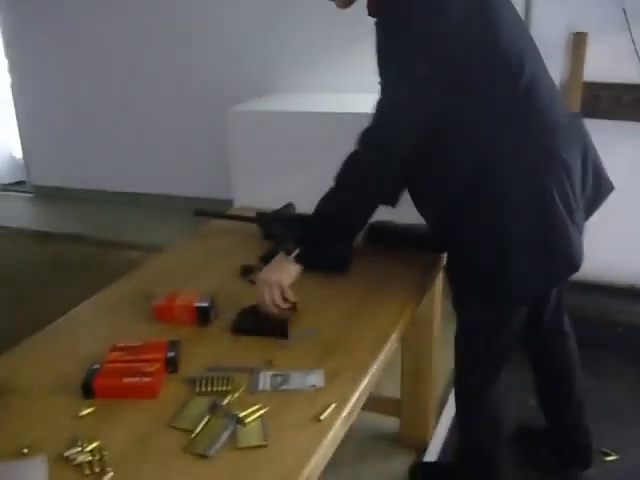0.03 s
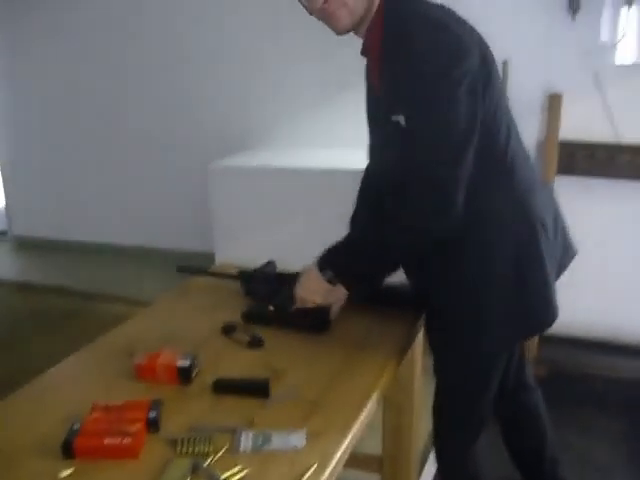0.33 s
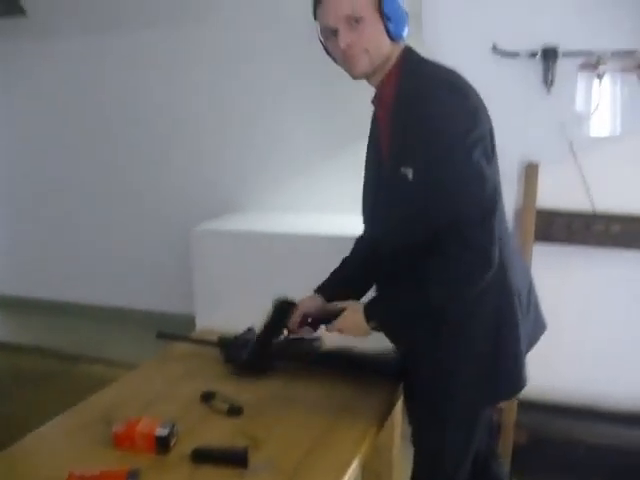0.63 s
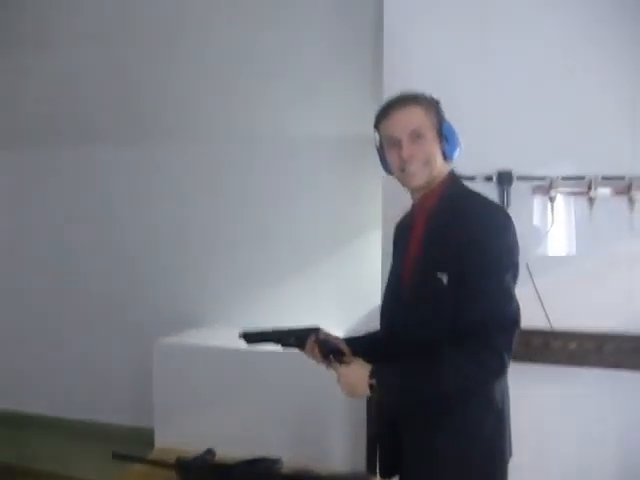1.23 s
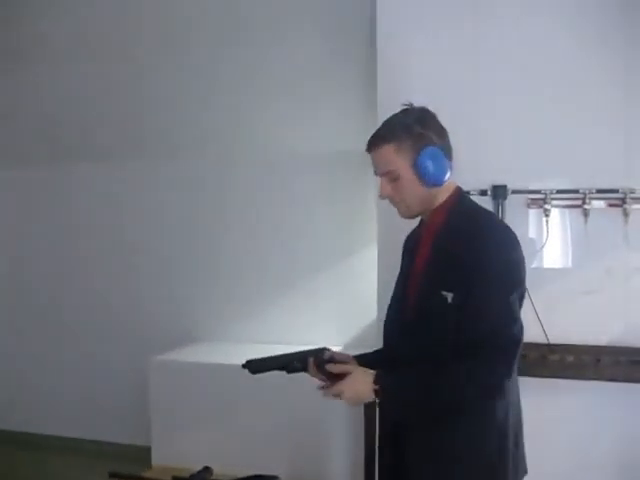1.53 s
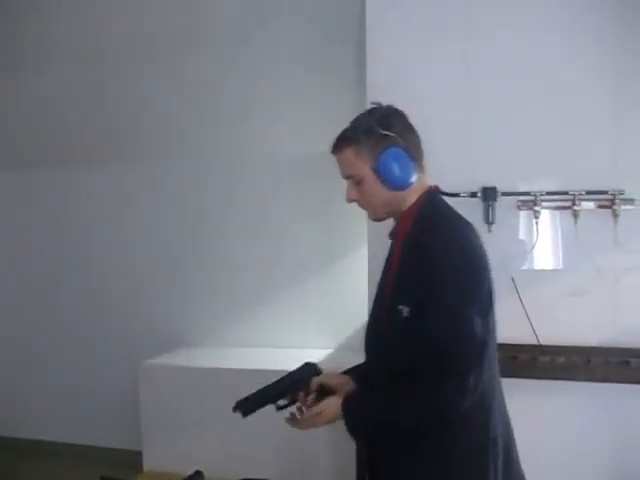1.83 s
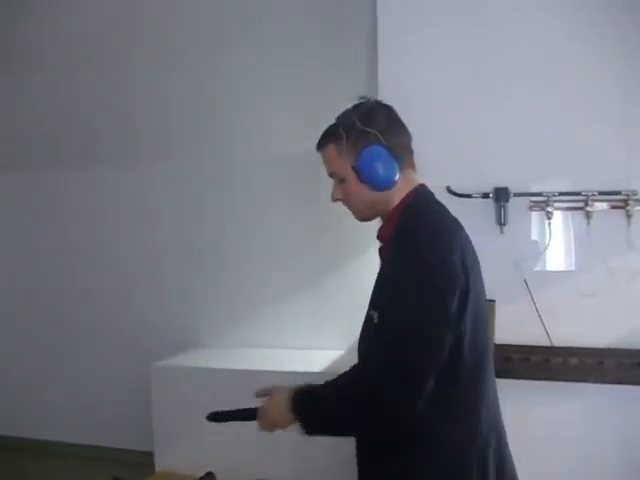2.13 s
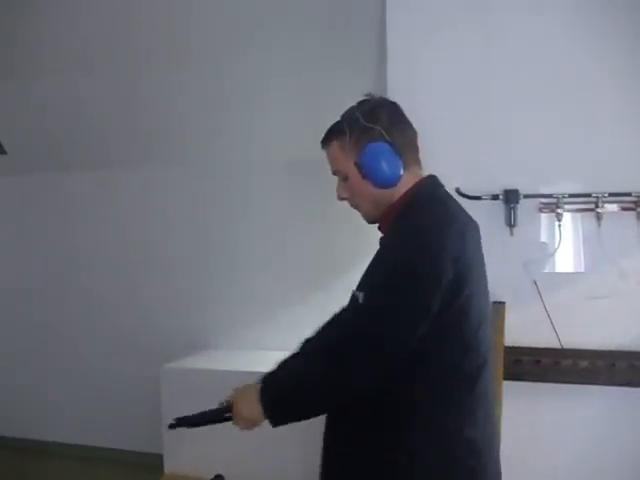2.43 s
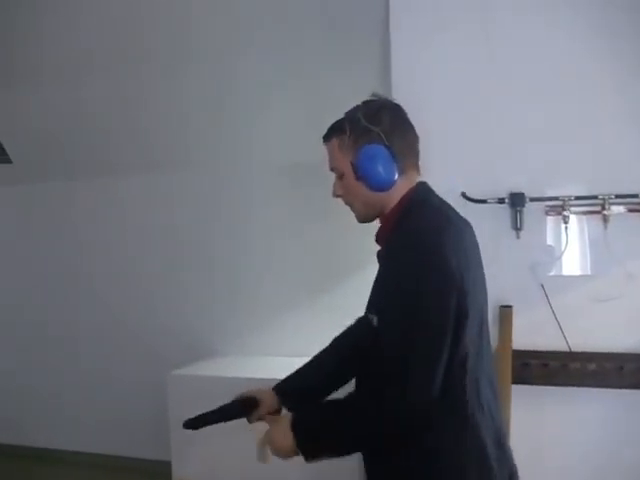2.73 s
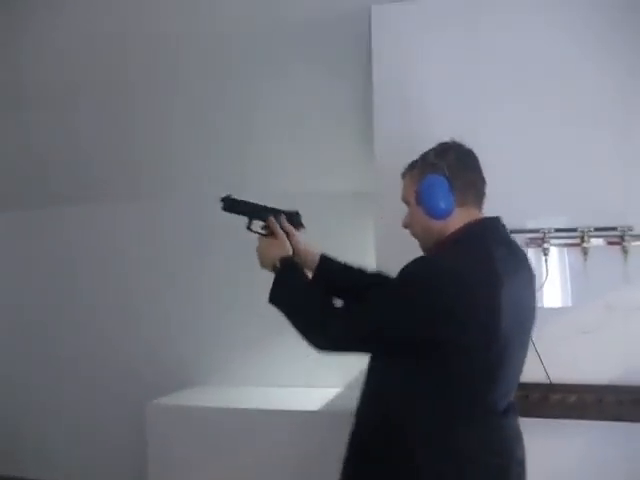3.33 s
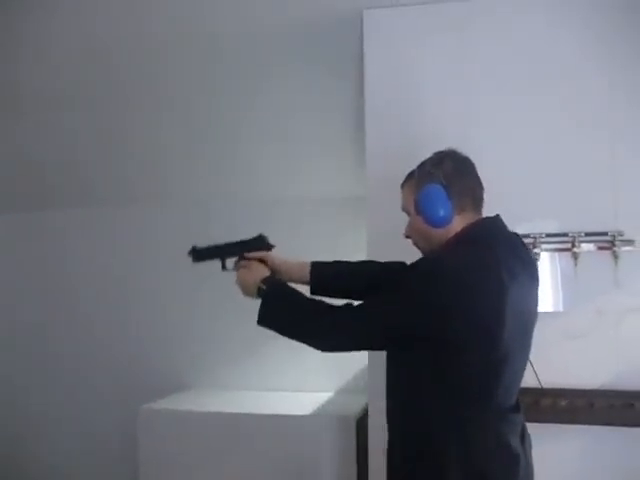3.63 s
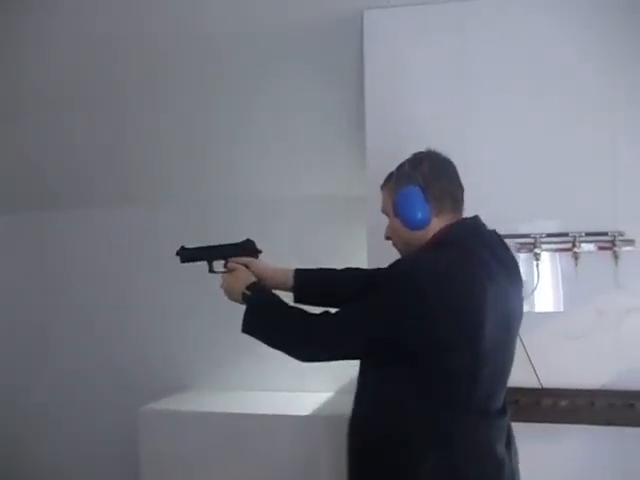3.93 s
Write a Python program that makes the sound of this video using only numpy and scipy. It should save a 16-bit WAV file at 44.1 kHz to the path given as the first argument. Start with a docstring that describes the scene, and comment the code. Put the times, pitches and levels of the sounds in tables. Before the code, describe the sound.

A pistol is handled with faint ticks at the start and around 0.9 and 1.3 seconds. Its magazine latches with a sharp click near 1.7 seconds. The slide clacks back at 2.5 and slams shut at 2.6 seconds with a dull thump, overloading the microphone and leaving a faint spring ring. A ventilation motor drones and buzzes throughout, with light hiss, in a small indoor range.

```python
"""A ventilation motor drones and buzzes over a little hiss while a pistol is picked up with light ticks.
The magazine latches; the slide clacks back, then slams home and overloads the microphone.
Each steel contact is a noise crack, a ping and a slide ring, answered by a small indoor range.
Heavy stops add a dull thump; the recoil spring sings after the last slam.
The motor runs throughout: harmonics of its turn rate, and a housing rung once a turn."""
import sys
import numpy as np
from scipy import signal
from scipy.fft import rfft, irfft, next_fast_len
from scipy.io import wavfile

SR = 44100
rng = np.random.default_rng(int(sys.argv[2]) if len(sys.argv) > 2 else 0)


def unload_wav(signal):
    """Save mono or channel-first audio to the path in sys.argv[1] as 16-bit WAV at rate SR, clipped to [-1, 1]."""
    wavfile.write(
        sys.argv[1],
        SR,
        np.round(np.clip(np.atleast_2d(signal).T, -1, 1) * 32767).astype(np.int16),
    )


N = 176400

# steel contacts: t/s, level/dB, t60/s, tilt/(dB/octave), ping f/Hz, ping re crack/dB
CONTACTS = [(0.0383, -29.5, 0.015, 1, 4960, -3), (0.8859, -26.5, 0.04, -3.5, 1353, 4),
            (1.3196, -20.5, 0.067, -7, 1890, -15), (1.332, -31, .04, -6.5, 2660, -1),
            (1.4, -30.5, 0.032, 1.5, 2430, -6), (1.5462, -29.5, .028, -5, 1370, -13),
            (1.6280, -23.5, 0.028, 3, 4930, -4), (1.6374, -21, 0.018, -2.5, 5020, -3),
            (1.6553, -14, 0.047, -0.2, 6300, -15), (1.6680, 3, 0.0089, 1.7, 11520, -8),
            (2.3848, -16.5, 0.016, 3.5, 5780, -6), (2.4191, -21, 0.037, 0, 1410, -2),
            (2.4463, -20.5, 0.022, 1, 6940, -7), (2.4536, -25.5, 0.055, 4, 5400, 0),
            (2.4612, -23, .03, 4, 7200, -9), (2.467, -15, .02, 8, 3700, -8),
            (2.4704, 1, 0.026, 3, 2435, -11), (2.4739, -9, .035, 7.5, 6110, 7),
            (2.5823, -29, 0.021, 3, 6600, 1), (2.596, -27, .03, 9, 8000, -10),
            (2.599, -16.5, 0.066, 5, 7330, 6.5), (2.609, -10, 0.082, 2.5, 7050, -11),
            (2.6137, -0.5, 0.032, -0.5, 5900, -13), (2.624, 2, 0.023, 5, 1986, -6),
            (2.6292, -0.5, 0.044, 3.5, 1465, -8.5), (2.7378, -29.5, 0.043, 2, 6100, -2)]
# crack spectrum: f/Hz, relative level/dB
CRACK_SPECTRUM = [(300, -31), (1000, -11), (1450, -4), (2000, -2), (2700, 2), (4000, 2.5), (6000, 1.5),
                  (7500, 0.5), (9500, -3), (10700, -9.5), (16500, -17.5)]
# slide and barrel modes: f/Hz, relative level/dB, t60/s
SLIDE_MODES = [(1540, -8, .09), (1976, -21, .1), (3600, -10, 0.1), (4436, -14, 0.13), (5300, -2, .08),
               (5912, -19, 0.092), (6600, -10, .12), (7060, -15, 0.063), (7900, -10, 0.061),
               (8479, -15, 0.09), (9356, -2, 0.086), (9500, -7, 0.26)]
# blows of the whole gun: t/s, level/dB, f/Hz, t60/s
BLOWS = [(0.0778, -30, 566, 0.042), (.079, -30, 1128, 0.033), (2.4668, 13.5, 105, 0.01),
         (2.468, 8.5, 694, 0.016), (2.4709, 2.5, 1150, 0.0072), (2.614, 8.5, 820, 0.0071),
         (2.6237, 16, 408.4, 0.022), (2.63, 8, 189, 0.013)]
# dull puff of a blow: f/Hz, relative level/dB
PUFF_SPECTRUM = [(40, -20), (130, -24), (250, 7.5), (450, 0.5), (750, -2), (1300, -2.5), (3000, -18),
                 (9000, -60)]
# early room decay: f/Hz, t60/s
ROOM_DECAY = [(200, 0.12), (1500, 0.1), (6000, 0.1), (10000, 0.13), (16000, 0.12)]
# low motor orders: multiple of turn rate, relative level/dB
DRONE_ORDERS = [(1, 0.5), (2, 0), (3, -11.5), (4, -13), (5, -10.5), (6, -6), (7, -27.5), (8, -12.5),
                (9, -23), (10, -18), (11, -22), (12, -34.5), (13, -21), (14, -34.5), (15, -36.5), (16, -68),
                (17, -29), (18, -34), (19, -25), (20, -39.5)]
# upper motor orders: f/Hz, base level per order/dB
BUZZ_SPECTRUM = [(950, -61.5), (1100, -69), (1350, -59.5), (1750, -66), (2000, -70), (2400, -70.5),
                 (3400, -72.5), (5000, -70), (6000, -76.5), (7300, -70.5), (8500, -89)]
# buzz envelope: t/s, gain/dB
BUZZ_ENVELOPE = [(0, -3), (.7, -3), (1.4, 1), (2.3, -1), (3.1, -1.5), (3.7, 1), (4, 0)]
# whining orders: f/Hz, lift/dB
WHINE_LIFTS = [(1197, 9.5), (1382, 9.5), (1566, 10.5), (3730, 15.5), (4237, 10), (4467, 10), (5204, 7.5),
               (7185, 1)]
# housing ring envelope: t/s, gain/dB
HOUSING_ENVELOPE = [(0, -41), (.25, -40), (.8, -47.5), (1.4, -42), (2.1, -44), (2.9, -43), (3.7, -39.5),
                    (4, -42)]
# ventilation rush: f/Hz, relative level/dB
RUSH_SPECTRUM = [(20, 2), (60, -2.5), (250, -0.5), (340, -9.5), (600, -15), (800, -13.5), (1400, -20),
                 (2200, -22), (4000, -26.5), (7300, -26), (9000, -32.5), (16000, -40.5)]
# hiss spectrum: f/Hz, relative level/dB
HISS_SPECTRUM = [(2000, -19), (6000, 1), (11000, 3), (17000, -2.5)]
# hiss envelope: t/s, level/dB
HISS_ENVELOPE = [(0, -68), (.8, -62), (1.3, -55.5), (2.2, -59.5), (2.9, -59.5), (3.3, -57.5), (3.7, -54),
                 (4, -57)]

MOTOR_HZ = 46.055  # turn rate


def steel_contacts(attack_s=0.00091, ping_wander_rad=0.064, ring_db=-30, full_ring_t60_s=0.053):
    """Each contact cracks, pings the struck part and rings the slide; briefer contacts ring it less."""
    out, t = np.zeros(N), np.arange(SR // 2) / SR
    for start_s, level_db, t60_s, tilt_db_oct, ping_hz, ping_db in CONTACTS:
        crack = noise(CRACK_SPECTRUM, len(t), tilt_db_oct) * decay(t, t60_s)
        wander_rad = ping_wander_rad * np.cumsum(rng.standard_normal(len(t)))
        ping = amp(ping_db) * np.sin(2 * np.pi * ping_hz * t + wander_rad) * decay(t, t60_s)
        ring = np.zeros(len(t))
        for mode_hz, mode_db, mode_t60_s in SLIDE_MODES:
            gain = amp(mode_db + rng.normal(0, 0.95))
            ring += gain * np.sin(2 * np.pi * (mode_hz * t + rng.random())) * decay(t, mode_t60_s)
        ring *= amp(ring_db) * t60_s / full_ring_t60_s
        attack = 1 - np.exp(-t / attack_s)
        add(out, start_s, room(amp(level_db) * (crack + ping + ring) * attack))
    return out


def gun_thumps(puff_db=-5):
    """A stop jolts the whole gun: a few low cycles and a dull puff."""
    out, t = np.zeros(N), np.arange(SR // 4) / SR
    for start_s, level_db, hz, t60_s in BLOWS:
        body = -np.sin(2 * np.pi * hz * t)
        puff = amp(puff_db) * noise(PUFF_SPECTRUM, len(t))
        add(out, start_s, amp(level_db) * (body + puff) * decay(t, t60_s))
    return out


def recoil_spring(start_s=2.634, hz=2300, level_db=-40.5, t60_s=0.64):
    """The spring sings one faint, long note after the slide slams home."""
    out, t = np.zeros(N), np.arange(SR) / SR
    add(out, start_s, amp(level_db) * np.sin(2 * np.pi * hz * t) * decay(t, t60_s))
    return out


def room(sound, delay_s=0.0058, early_db=-8, late_db=-26.5, late_t60_s=0.53):
    """Direct sound plus a short bright tail and a faint long one, drawn afresh per call."""
    hz, t, spectrogram = signal.stft(rng.standard_normal(SR // 2), SR, nperseg=128)
    early_t60_s = at_hz(ROOM_DECAY, hz)[:, None]
    early = signal.istft(spectrogram * decay(t, early_t60_s), SR, nperseg=128)[1]
    late = rng.standard_normal(len(early)) * decay(np.arange(len(early)) / SR, late_t60_s)
    tail = amp(early_db) * early / np.linalg.norm(early) + amp(late_db) * late / np.linalg.norm(late)
    response = signal.unit_impulse(SR)
    add(response, delay_s, tail)
    return signal.fftconvolve(sound, response)


def motor_drone(level_db=-25.5, first_beat_s=0.00308, skew_rad=0.71, scatter_rad_per_db=0.042):
    """Low orders line up into one lopsided beat a turn; weak ones stray in phase."""
    out, turns = np.zeros(N), MOTOR_HZ * (np.arange(N) / SR - first_beat_s)
    for order, order_db in DRONE_ORDERS:
        phase_rad = skew_rad + scatter_rad_per_db * order_db * rng.normal()
        out += amp(level_db + order_db) * np.cos(2 * np.pi * order * turns + phase_rad)
    return np.sqrt(2) * out


def motor_buzz(top_order=184, scatter_db=3, drift_db=1.5):
    """Upper orders, a few whining; each drifts slowly in level."""
    out, t = np.zeros(N), np.arange(N) / SR
    knots_s = np.linspace(0, t[-1], 6)
    for order in range(len(DRONE_ORDERS) + 1, top_order + 1):
        hz = order * MOTOR_HZ
        lift_db = sum(db for whine_hz, db in WHINE_LIFTS if abs(hz - whine_hz) < MOTOR_HZ / 2)
        stray_db = scatter_db * rng.normal() + drift_db * rng.standard_normal(len(knots_s))
        gain = np.interp(t, knots_s, amp(at_hz(BUZZ_SPECTRUM, hz) + lift_db + stray_db))
        out += gain * np.sin(2 * np.pi * (hz * t + rng.random()))
    return envelope(BUZZ_ENVELOPE) * out


def motor_housing(hz=2770, first_beat_s=0.016, rise_s=0.0039, t60_s=0.034, unevenness=0.25):
    """The housing is rung once a turn, a little unevenly: a thin tone."""
    turn, since_s = np.divmod(np.arange(N) / SR - first_beat_s, 1 / MOTOR_HZ)
    strength = 1 + unevenness * rng.uniform(-1.3, 1, int(turn[-1]) + 2)[turn.astype(int)]
    swell = 2 * (1 - np.exp(-since_s / rise_s)) * decay(since_s, t60_s)
    return envelope(HOUSING_ENVELOPE) * strength * swell * np.sin(2 * np.pi * hz * since_s)


def vent_air(rush_db=-41.5):
    """Low ventilation rush and a thin hiss that slowly swells."""
    rush = amp(rush_db) * noise(RUSH_SPECTRUM, N)
    hiss = envelope(HISS_ENVELOPE) * noise(HISS_SPECTRUM, N)
    return rush + hiss


def amp(db):
    """dB to gain."""
    return 10 ** (np.asarray(db) / 20)


def decay(t, t60_s):
    """Exponential fall, 60 dB in t60_s."""
    return np.exp(-np.log(1000) * t / t60_s)


def envelope(rows):
    """Gain per sample from rows of t/s, level/dB."""
    return amp(np.interp(np.arange(N) / SR, *np.transpose(rows)))


def at_hz(rows, hz):
    """Interpolate rows of f/Hz, value on a log axis."""
    knots_hz, values = np.transpose(rows)
    return np.interp(np.log(hz + 1), np.log(knots_hz + 1), values)


def noise(spectrum, size, tilt_db_oct=0):
    """Coloured noise, rms 1."""
    hz = np.fft.rfftfreq(size, 1 / SR)
    phasors = np.exp(2j * np.pi * rng.random(len(hz)))
    x = irfft(phasors * amp(at_hz(spectrum, hz) + tilt_db_oct * np.log2(hz + 1)), size)
    return x / np.sqrt(np.mean(x ** 2) + 1e-20)


def add(track, start_s, sound):
    """Mix in place at start_s."""
    start = round(start_s * SR)
    track[start:start + len(sound)] += sound[:len(track) - start]


def scene():
    """Pistol over ventilation, mono."""
    pistol = steel_contacts() + gun_thumps() + recoil_spring()
    ventilation = motor_drone() + motor_buzz() + motor_housing() + vent_air()
    return (pistol + ventilation)[None]


def record(dry, ceiling=0.95, cutoff_hz=17100):
    """Overload clips the hardest blows; a brick-wall low-pass follows."""
    size = next_fast_len(N + SR // 2)
    clipped = np.clip(dry, -ceiling, ceiling)
    passband = np.fft.rfftfreq(size, 1 / SR) < cutoff_hz
    return irfft(rfft(clipped, size) * passband, size)[..., :N]


dry = scene()
out = record(dry)
unload_wav(out)
```